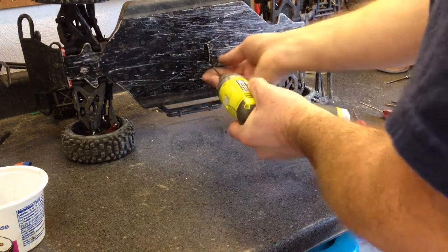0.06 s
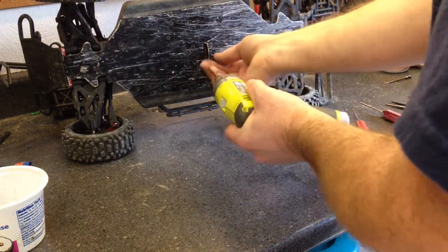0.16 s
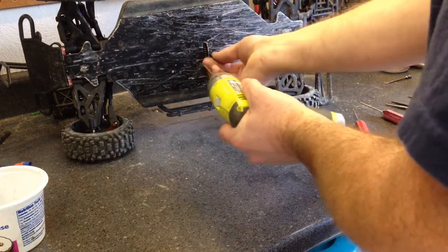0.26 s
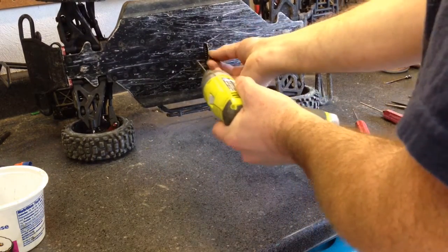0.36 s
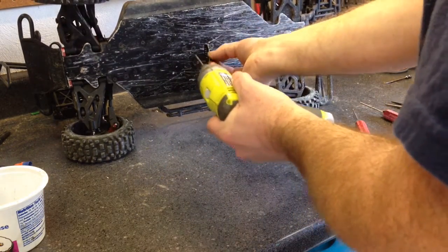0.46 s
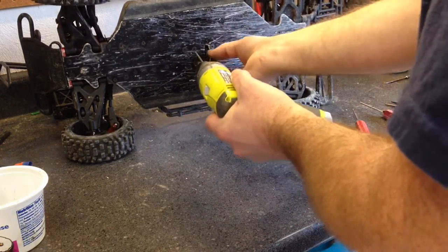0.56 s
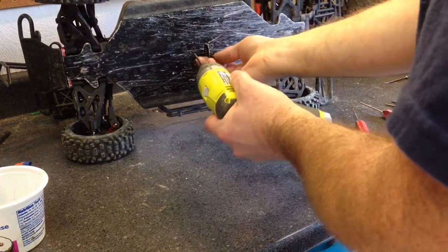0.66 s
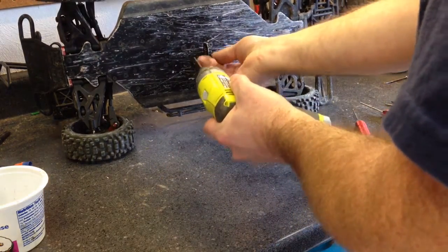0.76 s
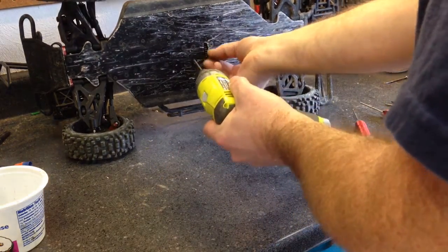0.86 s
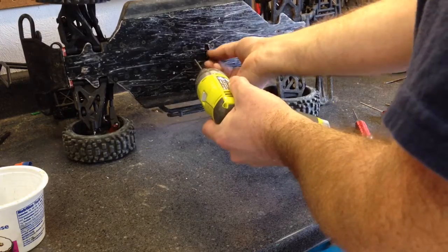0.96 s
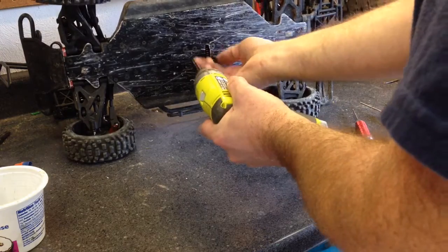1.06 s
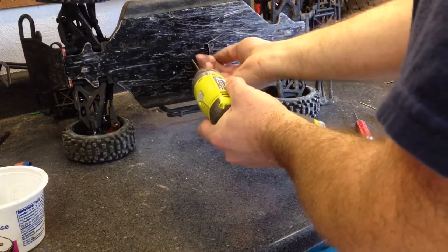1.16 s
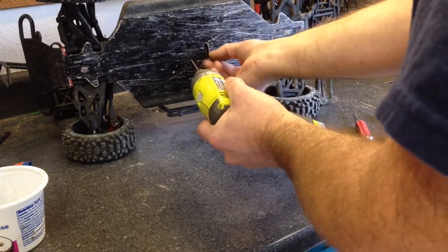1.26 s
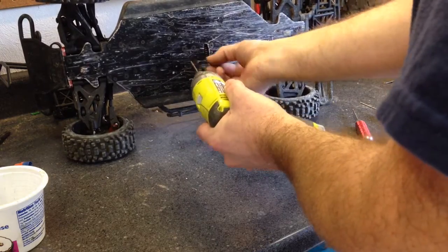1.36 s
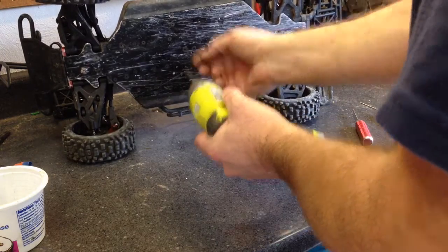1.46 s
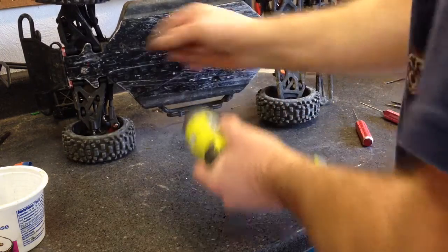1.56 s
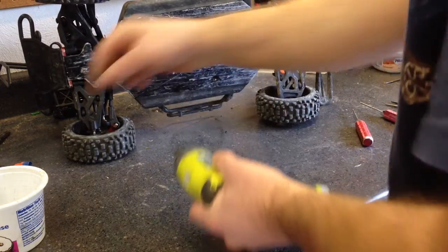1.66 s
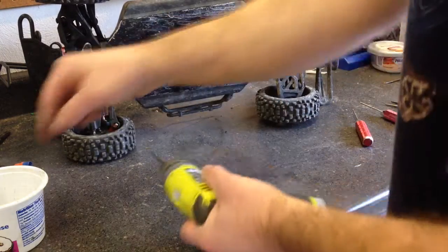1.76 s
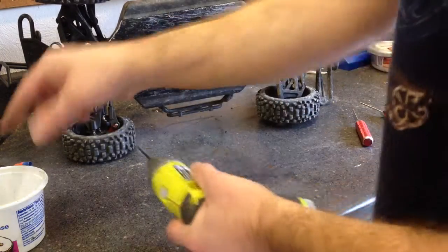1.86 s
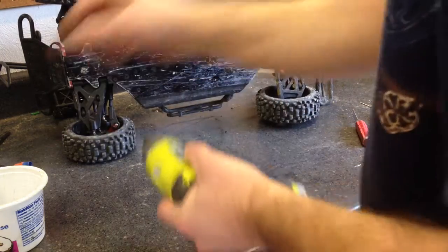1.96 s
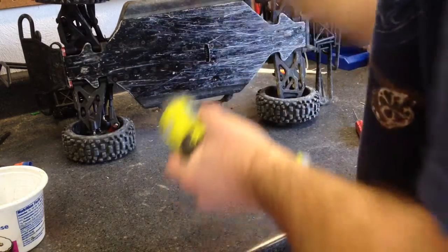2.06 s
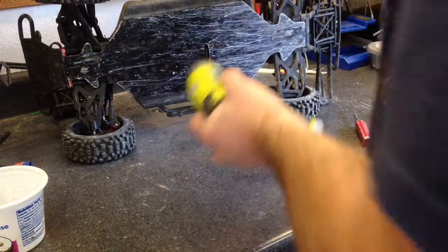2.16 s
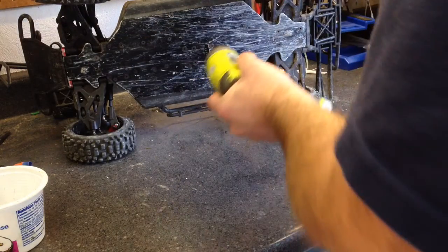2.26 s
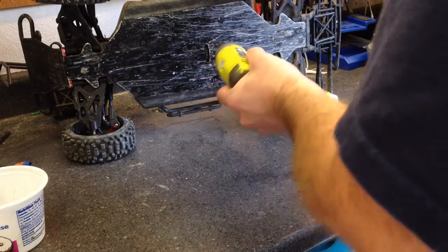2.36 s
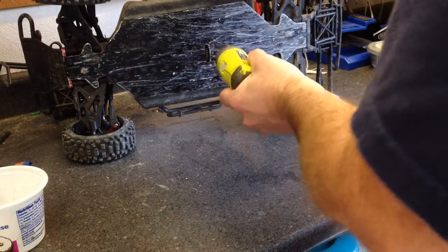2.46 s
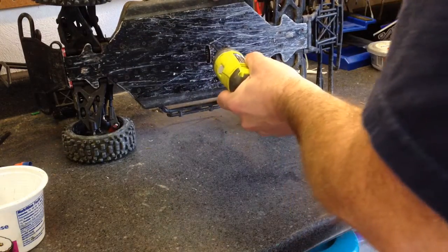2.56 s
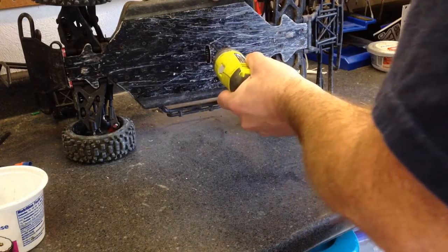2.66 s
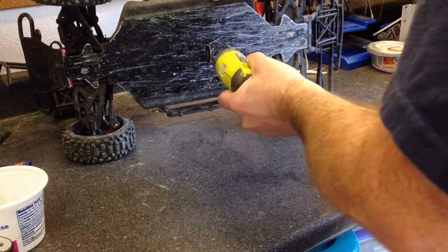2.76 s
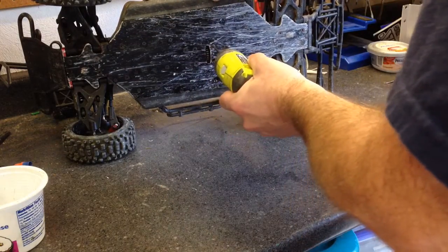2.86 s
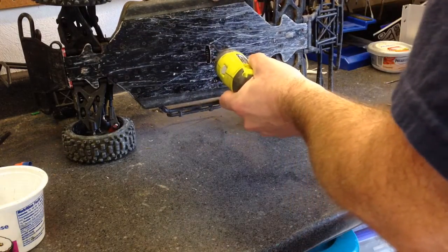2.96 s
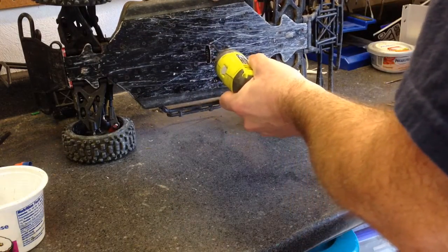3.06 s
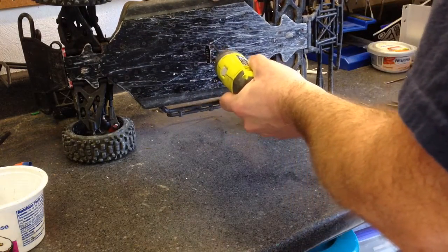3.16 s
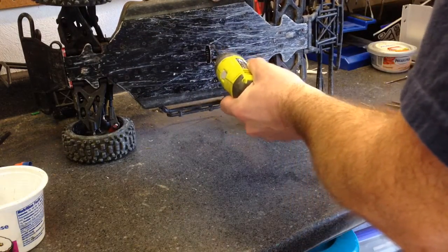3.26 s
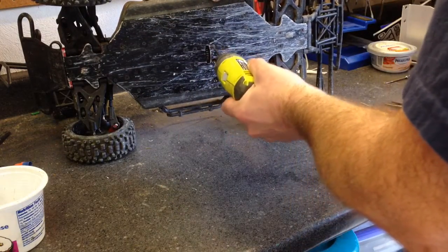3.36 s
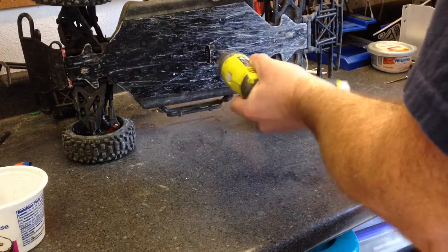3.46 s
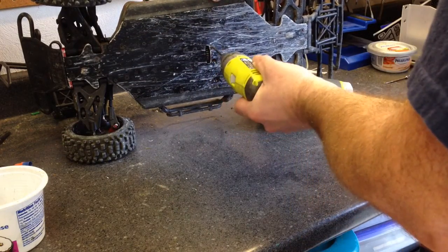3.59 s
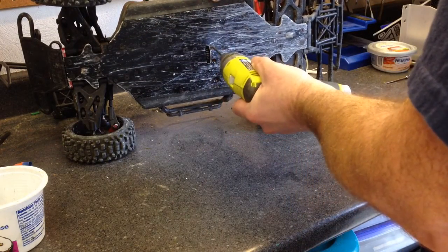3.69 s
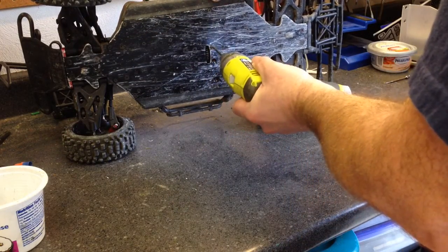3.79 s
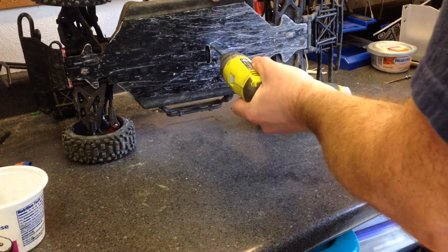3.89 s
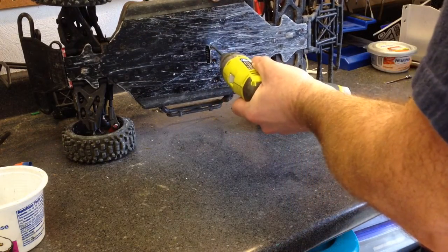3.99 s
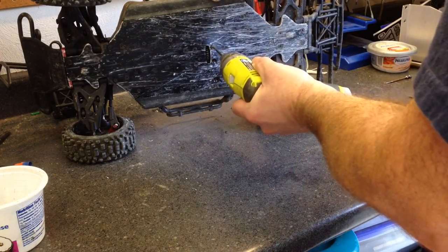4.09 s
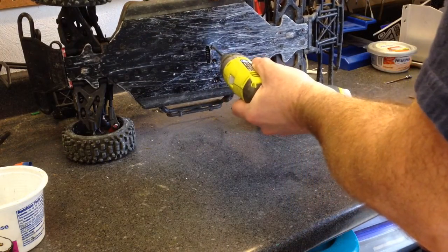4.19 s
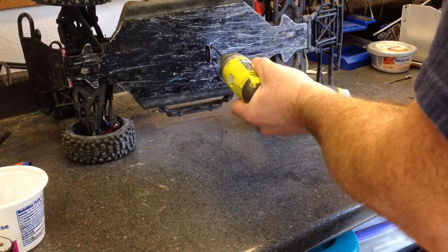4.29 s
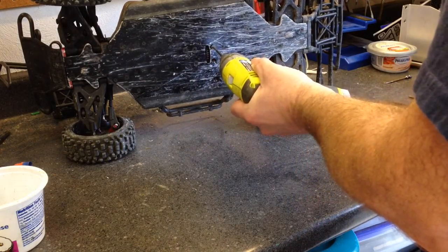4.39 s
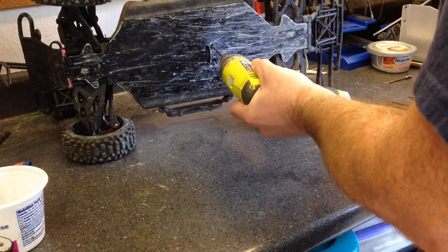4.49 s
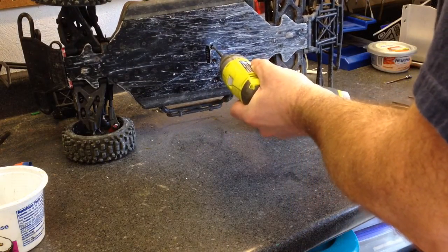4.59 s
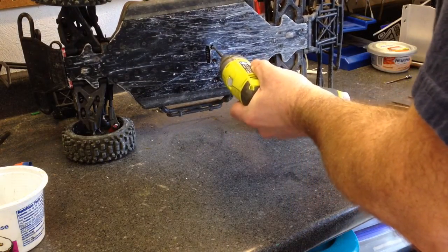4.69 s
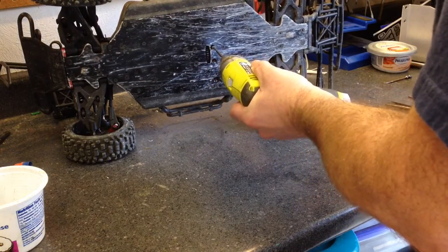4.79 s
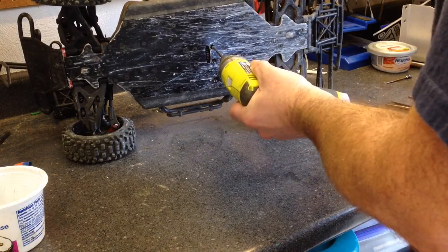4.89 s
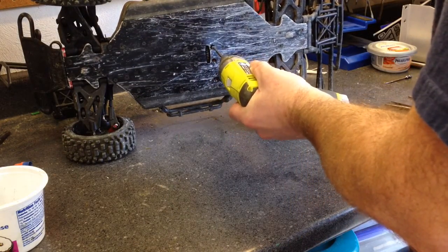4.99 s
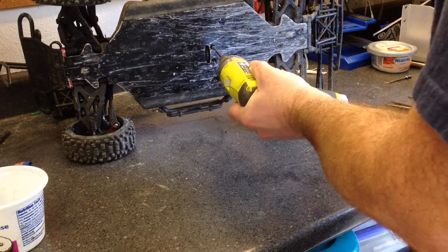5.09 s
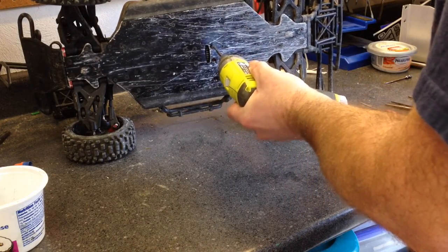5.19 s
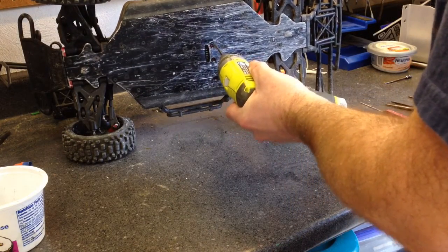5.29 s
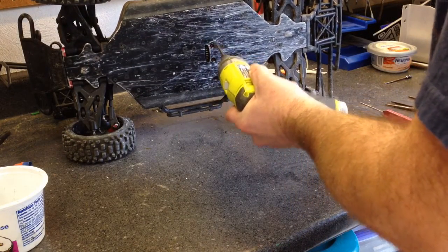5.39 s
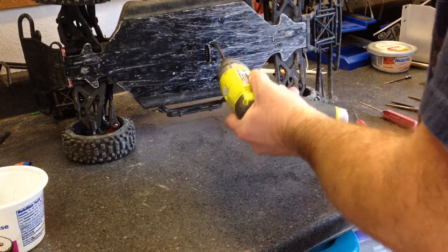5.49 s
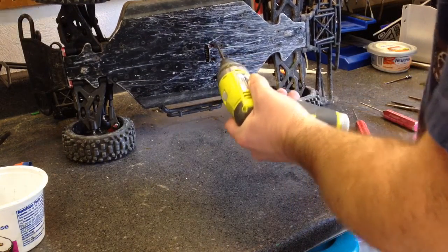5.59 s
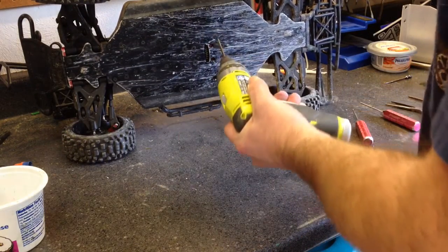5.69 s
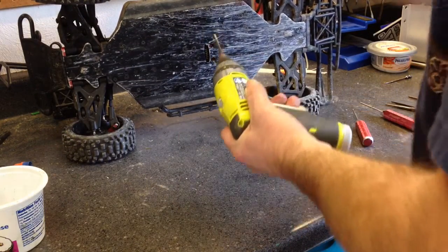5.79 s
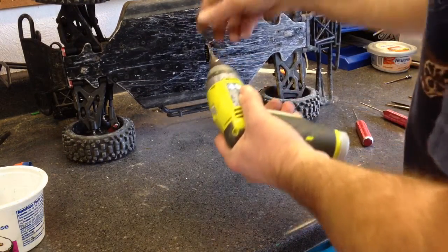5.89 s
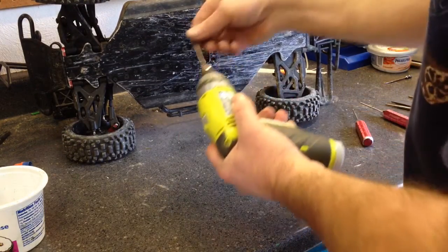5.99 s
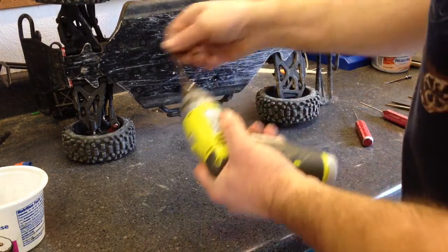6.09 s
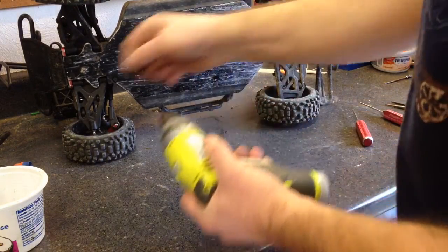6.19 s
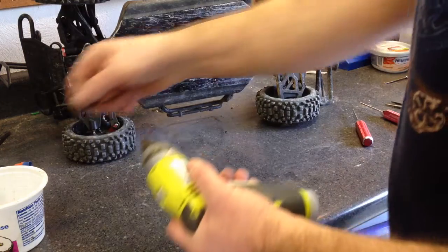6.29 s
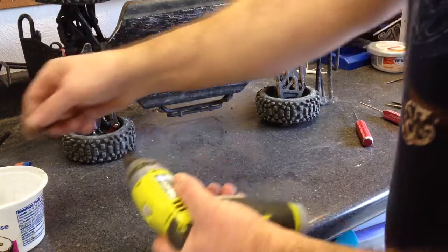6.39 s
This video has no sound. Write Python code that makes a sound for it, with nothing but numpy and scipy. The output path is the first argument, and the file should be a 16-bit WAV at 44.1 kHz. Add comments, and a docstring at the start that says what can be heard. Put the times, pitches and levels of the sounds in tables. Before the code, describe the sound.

A small electric screwdriver winds down, a screw clatters into a plastic tub, then the motor whirs for two seconds and coasts to a stop.

```python
"""Cordless screwdriver on a workbench

A small screwdriver close to a mono microphone. One run coasts out, a loose screw is picked off and dropped into a
plastic tub, the bit is seated, and the motor spins up, backs out a screw and coasts down. Motor and gears are tones
locked to shaft angle plus shaped knocking noise; the tub and ticks are decaying modes and noise bursts. Rustle is
shaped hiss; mains gear hums over the air noise of the workshop."""
import sys
import numpy as np
from scipy import signal
from scipy.fft import rfft, irfft
from scipy.io import wavfile
from scipy.ndimage import uniform_filter1d, minimum_filter1d

SR = 44100
rng = np.random.default_rng(int(sys.argv[2]) if len(sys.argv) > 2 else 0)


def wrap_up_sound(samples):
    """Save the sound to the file named by the first command line argument, as 16-bit audio."""
    columns = np.atleast_2d(samples).T
    # keep every value between -1 and 1, then stretch to whole-number steps
    tamed = np.clip(columns, -1, 1)
    steps = np.round(tamed * 32767).astype(np.int16)
    wavfile.write(sys.argv[1], SR, steps)


N = 284445
T = np.arange(N) / SR


def undb(db):
    """Amplitude factor of a level in dB."""
    return 10 ** (np.asarray(db) / 20)


def unit(x):
    """Scales to rms 1."""
    return x / np.sqrt(np.mean(x ** 2))


def curves(table):
    """Columns of a table as straight lines in time, ends held."""
    s, *columns = np.transpose(table)
    return [np.interp(T, s, c) for c in columns]


def colour(x, points):
    """Shapes a noise to (Hz, dB) points, straight over log frequency."""
    hz, db = np.transpose(points)
    f = np.fft.rfftfreq(len(x), 1 / SR) + 1  # + 1 avoids log 0
    gain = undb(np.interp(np.log(f), np.log(hz), db))
    return irfft(rfft(x) * gain, len(x))


def split(x, low_edge_hz, high_edge_hz):
    """Low, middle and high parts, each of rms 1."""
    f, spec = np.fft.rfftfreq(len(x), 1 / SR), rfft(x)
    low = 1 / (1 + (f / low_edge_hz) ** 8)
    high = 1 - 1 / (1 + (f / high_edge_hz) ** 8)
    return [unit(irfft(spec * w, len(x))) for w in (low, 1 - low - high, high)]


def walk(rate_hz):
    """Random levels, one per 1 / rate_hz s, smoothed twice over that time."""
    k = int(SR / rate_hz)
    steps = np.repeat(rng.standard_normal(N // k + 1), k)
    return 1.39 * uniform_filter1d(uniform_filter1d(steps, k), k)[:N]


def add(out, s, x):
    """Mixes a short sound in at time s."""
    i = int(s * SR)
    out[i:i + len(x)] += x[:N - i]


def rings(modes, t, trim_db=0):
    """Sum of exponentially decaying sine modes, rows of (Hz, dB, t60 s)."""
    hz, db, t60_s = np.transpose(modes)[:, :, None]
    return (undb(db + trim_db - 60 * t / t60_s) * np.sin(2 * np.pi * hz * t)).sum(axis=0)


def high_pass(x, hz):
    """Fifth-order Butterworth high-pass."""
    return signal.sosfilt(signal.butter(5, hz, "high", fs=SR, output="sos"), x)


PULLED_S = 3.632  # trigger
EARLIER_LET_GO_S, LET_GO_S = -.1, 5.408  # the earlier run is already coasting at the start
SPIN_UP_S, FULL_TURNS_PER_S = .052, 137
# coasting: drag grows with speed, friction acts like this many extra turns per s
DRAG_PER_S, FRICTION_TURNS_PER_S = 1.5, 200
# The shaft speeds up as the screw comes loose. Each row: time in seconds, speed in turns per second.
LOADED_SPEED = [(3.7, 122.6), (4.0, 125.0), (4.1, 125.3), (4.3, 129.0), (4.7, 131.8), (4.9, 133.7),
                (5.1, 136.7), (5.3, 136.9), (5.39, 138.0)]


def shaft():
    """Turns per second: spin-up to the loaded speed, then a coast to rest; also whether current flows."""
    powered = (T > PULLED_S) & (T < LET_GO_S)
    driven = curves(LOADED_SPEED)[0] * (1 - np.exp(-(T - PULLED_S) / SPIN_UP_S))
    since_s = T - np.where(T < PULLED_S, EARLIER_LET_GO_S, LET_GO_S)
    decay = np.exp(-DRAG_PER_S * since_s)
    coasting = np.maximum((FULL_TURNS_PER_S + FRICTION_TURNS_PER_S) * decay - FRICTION_TURNS_PER_S, 0)
    return np.where(powered, driven, coasting), powered


def halvings(speed):
    """Times the speed has halved from full speed."""
    return np.log2(FULL_TURNS_PER_S / np.maximum(speed, 1))


TONE_SLOPE_DB = -14  # per squared halving of speed
UNPOWERED_DB, WAVER_DB = -3, 1.5
START_DB, START_S = 14, .1  # mesh tones are stronger just after the trigger is pulled
# Main tones of commutator and gear mesh. Each entry: cycles per turn; multiples of 15 are mesh.
TONES_PER_TURN = (6, 12, 18, 15, 30, 45, 60)
# Each entry: peak level in dB of a main tone at full speed, before load, start, resonance and waver.
TONE_DB = [-60, -64, -58, -47, -48, -41, -53]
# Each entry: share of the load curve's dB that a main tone follows; only mesh tones use it.
LOAD_SHARE = [0, 0, 0, .8, .25, 1.2, .5]
# Mesh tones fade once the screw turns freely. Each row: time in seconds, level in dB.
MESH_LOAD = [(.3, -17), (3.6, -2), (3.86, -4), (4.0, 0), (4.42, 0), (4.65, -11), (5.38, -13), (5.46, -17)]
# Resonances of the motor can, for commutator tones. Each row: centre in Hz, width in Hz, gain in dB.
CAN_RESONANCES = [(448, 58, 25.5), (637, 127, 16), (734, 21, 15.5), (823, 73, 16), (905, 45, 34),
                  (1980, 420, 10), (2257, 110, 16), (2509, 60, 20.5)]
# Resonances of the gear case, for mesh tones. Each row: centre in Hz, width in Hz, gain in dB.
CASE_RESONANCES = [(1915, 90, 9), (3440, 150, 6), (3780, 200, 5), (4100, 200, 4)]
# Neighbours from uneven segments and teeth. Each row: cycles per turn, cycles per turn of the tone followed.
NEIGHBOURS = list(zip((4, 7, 8, 10, 11, 16, 17, 21, 28, 29, 31, 32, 33, 36, 37, 44, 46, 48),
              (15, 6, 30, 6, 15, 15, 6, 15, 30, 30, 30, 30, 45, 30, 30, 45, 45, 45)))
# Each entry: mean level in dB of a neighbour relative to the tone it follows.
NEIGHBOUR_DB = [-16.5, -32, -9, -9, -14, -17, -4, -7, -7, -6, -2.5, -9, -26, -8, -5, -30, 3, -14]


def resonance_db(hz, resonances):
    """Gain of a tone that glides through resonances, their powers summed."""
    power = 1
    for centre_hz, width_hz, gain_db in resonances:
        power = power + undb(2 * gain_db) / (1 + (2 * (hz - centre_hz) / width_hz) ** 2) ** 2
    return 10 * np.log10(power)


def motor(speed, powered, blur_db=-9, blur_rate_hz=200):
    """Commutator and gear mesh tones locked to the shaft; tooth errors smear a noisy skirt round the upper ones."""
    turn = 2 * np.pi * np.cumsum(speed) / SR
    drive_db = TONE_SLOPE_DB * halvings(speed) ** 2
    start_db = START_DB * powered * np.exp(-np.abs(T - PULLED_S) / START_S)
    current_db = UNPOWERED_DB * uniform_filter1d(1. * ~powered, SR // 50)
    load_db = curves(MESH_LOAD)[0]
    out, tone_levels_db = 0, {}
    coarse_speed = speed[::64]
    for k, db, share in zip(TONES_PER_TURN, TONE_DB, LOAD_SHARE):
        commutator = k % 15 != 0
        coarse_db = resonance_db(k * coarse_speed, CAN_RESONANCES if commutator else CASE_RESONANCES)
        swell_db = np.interp(T, T[::64], coarse_db)
        # commutator tones drop with the current, mesh tones follow the load
        cause_db = current_db if commutator else share * load_db + start_db
        level_db = db + drive_db + cause_db + swell_db + WAVER_DB * walk(12)
        tone_levels_db[k] = level_db
        skirt = undb(blur_db) * (walk(blur_rate_hz) + 1j * walk(blur_rate_hz)) if k > 12 else 0
        out = out + undb(level_db) * np.imag((1 + skirt) * np.exp(1j * k * turn))
    for (k, parent), db in zip(NEIGHBOURS, NEIGHBOUR_DB):
        # slow trend of the parent, own waver
        trend_db = uniform_filter1d(tone_levels_db[parent], SR // 16) + 2.5 * walk(14)
        out = out + undb(trend_db + db) * np.sin(k * turn + 2 * np.pi * rng.random())
    return out * (speed > 0), turn


TREBLE_DB, BITE_S = 2, 0.017  # treble relative to the middle part; fade-in after the trigger
RATTLE_SLOPE_DB, TREBLE_SLOPE_DB, LOW_SLOPE_DB = -7.5, -4.5, 0.5  # per halving of speed
# Colour of the knocks, with a rumble that the bench takes up near 90 Hz.
# Each row: frequency in Hz, relative density in dB per Hz.
HOUSING_COLOUR = [(45, -23), (90, 0.5), (170, -16.5), (500, -3), (1000, -1), (1500, -1.5), (2000, 7),
                  (2400, 7.5), (3000, 3), (4000, 9), (4900, 6), (6000, 5.5), (7300, 0.5), (9300, 0),
                  (12200, -4.5), (15300, -8)]
# The gears rattle less as the load drops.
# Each row: time in seconds, rattle at full speed in dB, low part relative to the middle part in dB.
RATTLE_LOAD = [(0, -41.5, -9.5), (3.66, -31.5, -13), (3.85, -34, -12), (4.0, -33.5, -13),
               (4.4, -34.5, -16.5), (4.58, -35.5, -12.5), (4.72, -35.5, -15), (5.0, -38, -9.5),
               (5.37, -38.5, -12), (5.55, -38.5, -5), (5.75, -35.5, -19)]


def rattle(speed, turn, grit_db=1.5, wobble=0.13, flicker_db=.6):
    """Loose teeth knock densely into the housing, a little harder once a turn; quieter and duller when slow."""
    grit = undb(grit_db * rng.exponential(size=N))
    knocks = rng.standard_normal(N) * grit * (1 + wobble * np.cos(turn))
    low, mid, high = split(colour(knocks, HOUSING_COLOUR), 1700, 7000)
    db, low_db = curves(RATTLE_LOAD)
    slow = halvings(speed)
    bite = np.where(T > PULLED_S, np.clip((T - PULLED_S) / BITE_S, 0, 1), 1) * (speed > 0)
    treble = undb(TREBLE_DB + TREBLE_SLOPE_DB * slow) * high
    bass = undb(low_db + LOW_SLOPE_DB * slow) * low
    level = undb(db + RATTLE_SLOPE_DB * slow + flicker_db * walk(25.18))
    return bite * level * (mid + treble + bass)


# The screw lands, rocks and bounces. Each row: start in seconds, trims of the wall, treble and bottom
# modes in dB, decay time constant of the scrape in seconds (0.0001 at least).
BOUNCES = [(1.9926, -4.5, -11.5, -21.5, 0.00035), (1.995, -15.5, -18.5, -26.5, 0.00088),
           (2.011, -31, -40.5, -58.5, 0.0035), (2.032, -40, -41, -62, .002),
           (2.039, -28, -38, -58.5, 0.0025), (2.049, -30, -40, -30, 0.0047),
           (2.0985, -17, -32, -58, 0.00051), (2.1068, -15, -22.5, -51, 0.00069),
           (2.131, -27, -37, -43, 0.0013), (2.151, -24, -42, -45, 0.005)]
# Modes of the tub: the first is the bottom, the next five the wall, the rest small high modes.
# Each row: frequency in Hz, relative level in dB, t60 in seconds.
TUB_MODES = [(406, -5.5, 0.066), (843, -10, 0.036), (910, 4.5, 0.016), (1070, -3.5, 0.024),
             (1222, -8, 0.043), (1530, -6, .04), (2120, -13, 0.048), (2350, -9, .02), (2280, 3, 0.027),
             (2867, 4.5, .025), (3260, 0, 0.043), (3470, 4.5, .02), (3910, -1, 0.019), (4026, 0.5, 0.028),
             (4680, -0.5, 0.03), (5100, 3.5, .02), (5760, -12, 0.03), (6150, -5, .02), (7000, -19.5, .02),
             (8700, -14, 0.016)]


def tub(crack_db=2, crack_t60_s=0.036, grit_db=3.5):
    """Each contact rings bottom, wall and high modes of the tub; rolling shakes them with grit."""
    out, t = np.zeros(N), T[:int(.15 * SR)]
    bottom, wall, high = TUB_MODES[:1], TUB_MODES[1:6], np.array(TUB_MODES[6:])
    for s, wall_db, treble_db, bottom_db, scrape_s in BOUNCES:
        # every contact falls on another spot, which shifts the small modes a little
        spot = rng.standard_normal((len(high), 2))
        shifted = high * np.c_[1 + .03 * spot[:, 0], np.ones((len(high), 2))]
        ring = rings(shifted, t, treble_db + 2 * spot[:, 1:])
        push = rng.standard_normal(len(t)) * np.exp(-t / max(scrape_s, 1e-4))
        blow = signal.fftconvolve(ring, push / np.sqrt(np.sum(push ** 2)))[:len(t)]
        crack_colour = [(1200, -20.5), (3000, 4.5), (7000, -1.5), (14000, -13.0)]
        crack = unit(colour(rng.standard_normal(len(t)), crack_colour))
        blow += crack * undb(crack_db + treble_db - 60 * t / crack_t60_s)
        # the large modes take a moment to build, and thin plastic moves no air below them
        swell = 1 - np.exp(-t / .0008)
        knock = high_pass(blow + swell * rings(wall, t, wall_db), 640)
        boom = high_pass(swell ** 2 * rings(bottom, t, bottom_db), 320)
        add(out, s, knock + boom)
    grit = rng.standard_normal(N) * undb(grit_db * rng.exponential(size=N))
    # the rolling screw damps the wall that it touches
    damped = rings(TUB_MODES[1:], t) * np.exp(-t / .003)
    shaken = unit(signal.fftconvolve(grit, damped)[:N]) + 0.15 * unit(np.diff(grit, prepend=0))
    return out + high_pass(rolling() * shaken, 640)


ROLL_SAG_DB_PER_S, ROLL_STOP_DB_PER_S = 139, 700
# After a bounce the screw rolls, then stops. Each row: start in seconds, starting gain in dB, length in seconds.
ROLLS = [(1.995, -27, .07), (2.108, -26, .004), (2.155, -33, .008)]


def rolling():
    """Envelope of the rolls: each starts at once, sags while it lasts and dies fast."""
    envelope = 0
    for s, db, length_s in ROLLS:
        sag_db = ROLL_SAG_DB_PER_S * np.clip(T - s, 0, length_s)
        stop_db = ROLL_STOP_DB_PER_S * np.clip(T - s - length_s, 0, 1)
        envelope = envelope + (T > s) * undb(db - sag_db - stop_db)
    return envelope


# Bit, screw and trigger tick on metal and plastic. Each row: start in seconds, initial rms level in dB, lower and
# upper soft edge in Hz, t60 in seconds, thud level in dB, trim of the screw's ring in dB.
TICKS = [(0.107, -46, 2500, 13000, .04, -72, -85), (.19, -55.5, 2500, 13000, 0.1, -75, -85),
         (1.101, -46, 3620, 13500, .022, -72, -68), (1.1553, -52, 1800, 5500, 0.046, -70, -80),
         (1.3266, -29, 7050, 13600, 0.069, -47, -46), (1.3302, -26, 4500, 5370, 0.05, -57, -58),
         (1.335, -42, 2550, 5000, 0.12, -58, -42), (1.4521, -56, 7500, 15000, .05, -80, -78),
         (2.4149, -49, 2460, 8300, 0.066, -67, -87), (2.4513, -46, 2520, 10900, 0.048, -59, -81),
         (2.6319, -46.5, 1500, 8980, 0.039, -36.5, -78), (3.2824, -46, 3350, 11400, 0.042, -40, -80),
         (3.6344, -48, 5000, 14100, 0.04, -73, -81), (3.6426, -36, 3350, 3700, 0.022, -60.5, -78),
         (5.8444, -60.5, 6450, 11000, .08, -78, -82.5), (5.87, -63, 8000, 11000, .06, -82, -88),
         (5.9294, -62, 8050, 14000, 0.027, -83, -77)]
# Modes of the screw. Each row: frequency in Hz, relative level in dB, t60 in seconds.
SCREW_MODES = [(2530, 6, .05), (2980, 6, .05), (3400, 6, .045), (4214, 6, .04), (4770, 0, .12),
               (5035, 4, .05), (6120, -3, .14), (6815, -8, .1), (8180, 2, .1), (8480, 2, .07),
               (8980, 1, .06), (12100, -3, .05)]


def ticks(thud_hz=800, thud_t60_s=0.032):
    """A noisy tick, a dull thud from the part that is struck, and the thin ring of the screw."""
    out, t = np.zeros(N), T[:int(.25 * SR)]
    edge = np.minimum(t / .0005, 1)
    dull_colour = [(thud_hz / 3, -20), (thud_hz, 0), (thud_hz * 3.4, -14), (thud_hz * 6, -30)]
    for s, db, low_hz, high_hz, t60_s, thud_db, ring_db in TICKS:
        noise = rng.standard_normal((2, len(t)))
        bright_colour = [(low_hz / 2, -45), (low_hz, 0), (high_hz, -6), (high_hz * 1.5, -24)]
        bright = unit(colour(noise[0], bright_colour))
        dull = unit(colour(noise[1], dull_colour))
        add(out, s, edge * undb(db - 60 * t / t60_s) * bright)
        add(out, s, edge * undb(thud_db - 60 * t / thud_t60_s) * dull)
        add(out, s, edge * rings(SCREW_MODES, t, ring_db))
        add(out, s, rings([(728, thud_db, 0.069)], t))  # the struck part rings briefly
    return out


HISS_DB = -84.5  # steady floor
# Swells of hiss, perhaps fingers and sleeves. Each row: middle in seconds, peak in dB, length in seconds.
BRUSHES = [(.41, -69, .15), (.65, -69, 0.22), (0.902, -70.5, 0.88), (1.12, -65, 0.11), (1.26, -62, .1),
           (1.407, -66, 0.4), (1.623, -67, 0.089), (1.823, -72, 0.65), (2.42, -69, 0.2), (2.545, -68, 0.17),
           (2.874, -69, 0.038), (3.583, -67, 0.18), (5.874, -68, 0.25), (6.4, -76, .3)]


def rustle():
    """Faint high hiss, perhaps of skin and cloth, that swells and fades as shaped noise."""
    hiss_colour = [(1500, -24.0), (5000, 2.0), (9000, -4.0), (15000, -8)]
    hiss = unit(colour(rng.standard_normal(N), hiss_colour))
    swell = 0
    for s, db, length_s in BRUSHES:
        swell = swell + undb(db) * np.cos(np.pi * np.clip((T - s) / length_s, -.5, .5)) ** 2
    return (undb(HISS_DB) + swell) * hiss


AIR_DB = -55.5  # mean level
# Colour of the air noise. Each row: frequency in Hz, relative density in dB per Hz.
AIR_COLOUR = [(20, -46.5), (32, -28), (55, -9), (120, -20), (170, -15.5), (330, -14.5), (500, -17),
              (800, -17), (1300, -19), (2500, -26), (6000, -35.5), (15300, -46)]
# Hum of mains gear. Each row: frequency in Hz, mean rms level in dB.
HUM_LINES = [(64, -69), (90, -67), (120, -64), (240, -59), (360, -69)]


def workshop():
    """Air noise that swells a little, and hum lines that waver in level and phase."""
    air = unit(colour(rng.standard_normal(N), AIR_COLOUR)) * undb(AIR_DB + .5 * walk(0.93))
    hum = 0
    for hz, db in HUM_LINES:
        level = np.sqrt(2) * undb(db + 1.5 * walk(6.1))
        hum = hum + level * np.sin(2 * np.pi * hz * T + 0.19 * walk(8))
    return air + hum


SHOP_T60_S, SHOP_DB = .28, -23


def walls(hits):
    """The walls answer the hits with a short, dull tail of decaying noise."""
    t = T[:int(.6 * SR)]
    noise = colour(rng.standard_normal(len(t)), [(300, -8.5), (2000, 2.5), (12000, -8.5)])
    tail = noise * undb(-60 * t / SHOP_T60_S) * (t > .008)
    return undb(SHOP_DB) * signal.fftconvolve(hits, tail / np.sqrt(np.sum(tail ** 2)))[:N]


def scene():
    """Sums all sources into two equal channels."""
    speed, powered = shaft()
    tones, turn = motor(speed, powered)
    hits = tub() + ticks()
    mono = tones + rattle(speed, turn) + hits + walls(hits) + rustle() + workshop()
    return np.array([mono, mono])


CEILING, TOP_HZ = .92, 15500


def record(dry):
    """A limiter holds the loudest peak under the ceiling, then a steep low-pass cuts the top."""
    peak = uniform_filter1d(-minimum_filter1d(-np.abs(dry), size=161), size=81)
    held = dry * np.minimum(CEILING / peak, 1)
    return signal.sosfilt(signal.ellip(12, .2, 100, TOP_HZ, fs=SR, output="sos"), held)


dry = scene()
out = record(dry)
wrap_up_sound(out)
```